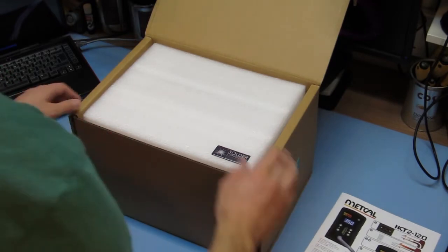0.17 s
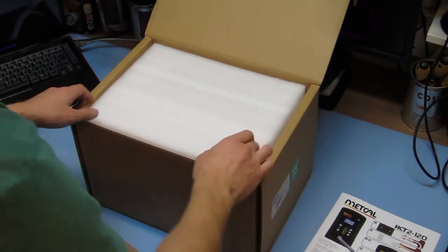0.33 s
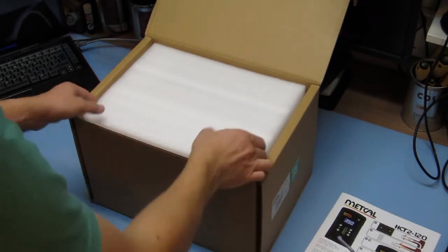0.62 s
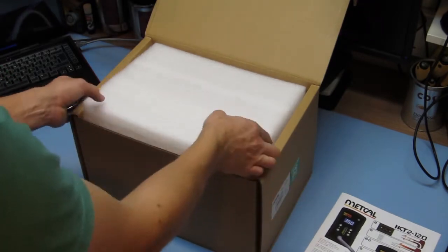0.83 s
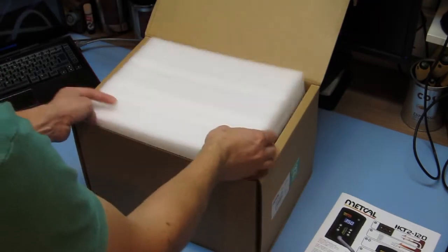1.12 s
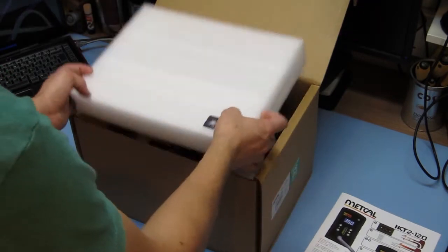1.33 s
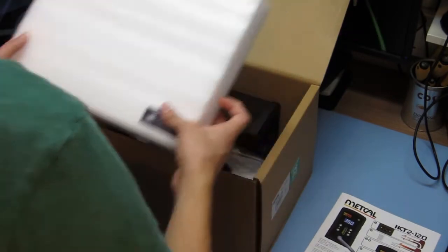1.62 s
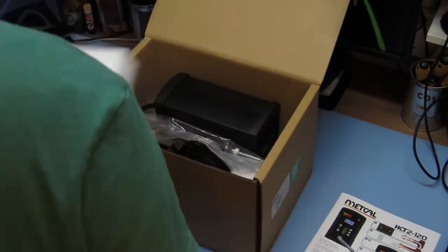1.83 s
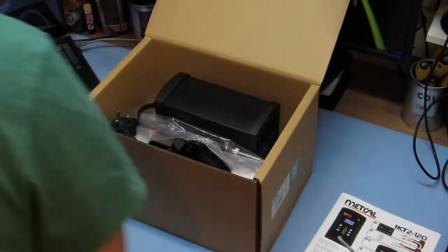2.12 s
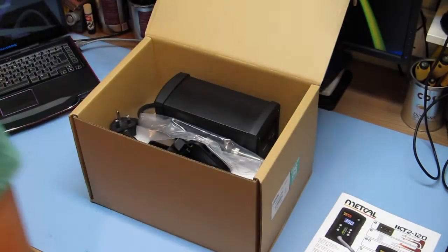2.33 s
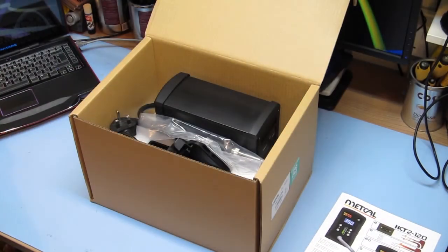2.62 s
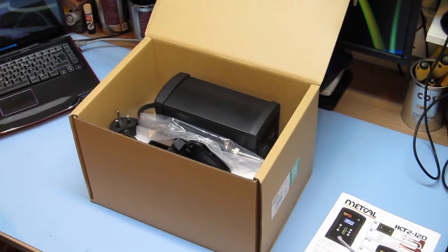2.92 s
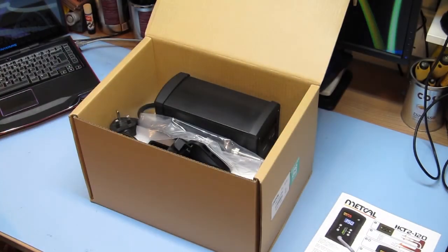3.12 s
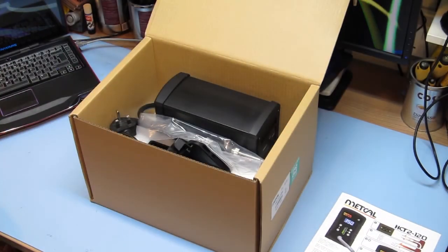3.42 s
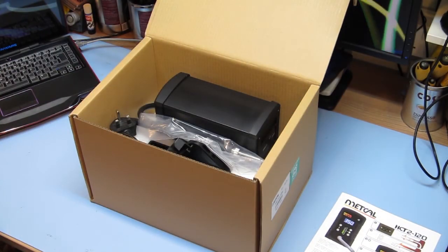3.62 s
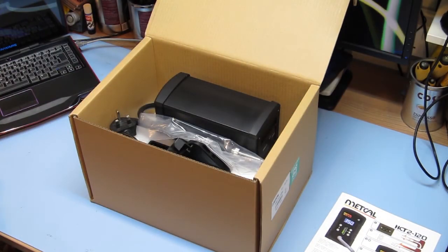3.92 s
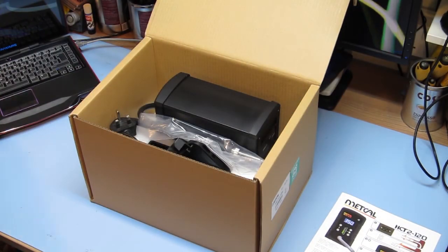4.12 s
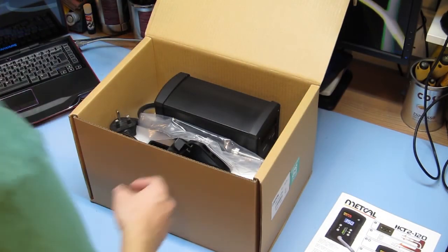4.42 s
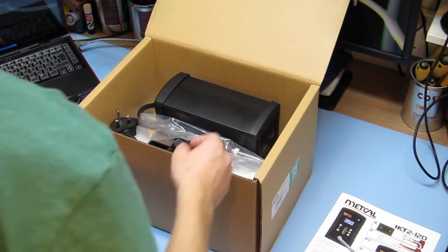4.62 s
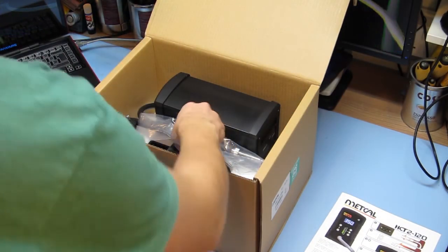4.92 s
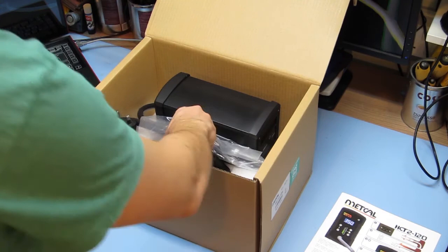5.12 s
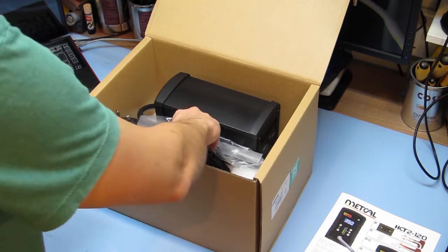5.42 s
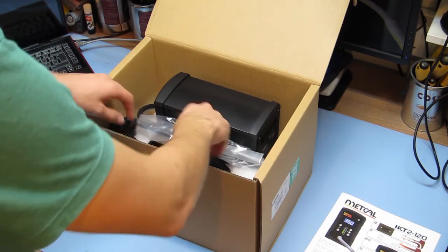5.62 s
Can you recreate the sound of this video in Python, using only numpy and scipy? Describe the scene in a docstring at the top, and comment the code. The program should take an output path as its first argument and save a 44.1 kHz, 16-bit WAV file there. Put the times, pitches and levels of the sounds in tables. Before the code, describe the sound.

A small, cluttered room with a quiet steady fan and low electrical hum, heard closely in stereo with slightly dull treble. From 0.3 to 0.75 s, soft touches, light foam rubbing and small ticks. Between 0.8 and 1.35 s, short coarse scrapes come quickly; at 1.04 s the foam jerks free with a sharp woody snap, a hollow thump and soft panel boom. Rubbing fades around 1.5 s, then two strong boxy knocks land at 1.73 and 1.78 s, followed by a breathy scrape at 2 s. It quietens, then dull thumps at 3.1 and 3.36 s and soft scrapes mark setting down, slightly left, with a tiny high squeak at 3.27 s. Faint rustles continue; a double hollow thump comes at 4.4 s. From 4.95 s plastic crackles in bright, uneven clicks, densest near 5.1 s, thinning with minute squeaks until 5.75 s.

```python
"""Foam pulled from a cardboard box

A small workroom with a humming fan, miked in stereo among near surfaces and with a dull treble.
Stroke by stroke a foam insert is gripped, pulled out with a snap and a scrape, and set down nearby, to the left.
Sparse random slips make the scrape, damped swings the hollow thumps, ringing modes the snap, noise bursts the ticks.
Gliding sines make brief squeaks; then a hand crinkles a plastic bag inside the box, as swells of coarser grains."""
import sys
import numpy as np
from scipy import signal
from scipy.io import wavfile

SR = 44100
rng = np.random.default_rng(int(sys.argv[2]) if len(sys.argv) > 2 else 0)


def generate_wav(signal):
    """Clip the signal to [-1, 1] and save it as 16-bit WAV at the path in sys.argv[1]."""
    frames = np.transpose(np.atleast_2d(signal))
    scaled = np.clip(frames, -1, 1) * 32767
    pcm = np.round(scaled).astype(np.int16)
    wavfile.write(sys.argv[1], SR, pcm)


N = 253839
TIME = np.arange(N) / SR


def from_db(db):
    """Decibels to gain."""
    return 10 ** (np.asarray(db) / 20)


def rms_one(x):
    """Scale to unit power."""
    return x / np.sqrt(np.mean(x ** 2) + 1e-20)


def at_hz(points, hz):
    """Read a spectrum on a log-frequency axis."""
    f, value = np.transpose(points)
    return np.interp(np.log(hz), np.log(f), value)


def cut(x, hz, kind):
    """Butterworth low-, high- or band-pass, designed at order 2."""
    corners_hz = np.clip(hz, 10, .45 * SR)
    sections = signal.butter(2, corners_hz, kind, fs=SR, output="sos")
    return signal.sosfilt(sections, x + 1e-18)  # the tiny offset keeps the filter out of denormal numbers


def drift(rate):
    """Random wander of spread 1, joined by straight lines between 2 * rate knots a second."""
    knots = np.arange(0, TIME[-1] + 1, .5 / rate)
    return np.interp(TIME, knots, rms_one(rng.standard_normal(len(knots))))


def white(size=N):
    """Four unrelated noises, as two mid-side pairs."""
    return rng.standard_normal((2, 2, size))


def grains(per_s, spread_db):
    """Tiny slips at random moments, of slightly uneven size."""
    happens = rng.random(N) < per_s / SR
    size_db = spread_db * np.minimum(rng.exponential(1, N), 4)
    return white() * happens * from_db(size_db)


# how alike the left and right microphones hear: f/Hz, correlation (1 = identical)
LIKENESS = [(50, 0.79), (300, 0.58), (1000, 0.79), (2500, 0.46), (5000, 0.22), (10000, 0.17), (16000, 0.17)]


def colour(drive, spectrum):
    """Half-octave bands shape a drive into stereo sound, mostly wider towards the treble; rms 1."""
    out = 0
    edges_hz = 17000 / np.sqrt(2) ** np.arange(19, -1, -1)
    for k, (low, high) in enumerate(zip(edges_hz, edges_hz[1:])):
        hz = np.sqrt(low * high)
        if spectrum[0][0] < high and low < spectrum[-1][0]:
            mid, side = cut(drive[k % 2], [low, high], "band")  # neighbouring bands use different noise
            alike = at_hz(LIKENESS, hz)
            stereo = np.sqrt(1 + alike) * mid + np.sqrt(1 - alike) * side * [[1], [-1]]
            out = out + from_db(at_hz(spectrum, hz)) * stereo
    return rms_one(out)


def add(out, s, sound):
    """Mix a short sound in at time s."""
    i = round(s * SR)
    out[:, i:i + sound.shape[-1]] += sound[..., :N - i]


def burst(spectrum, crack_s, tail_s, tail_db, rise_s=0.0009):
    """A crack and a short rattling tail; peak 1."""
    t = TIME[:SR // 5]
    decay = np.exp(-t / crack_s) + from_db(tail_db) * np.exp(-t / tail_s)
    shape = decay * (1 - np.exp(-t / rise_s))
    sound = colour(white(size=len(t)) * shape, spectrum)
    return sound / np.abs(sound).max()


def to_the_left(x, lag_s):
    """Sound from the left reaches the right microphone a moment later."""
    return np.array([x[0], np.interp(TIME - lag_s, TIME, x[1])])


# the level is this far down one rise time before and one fall time after the peak
SWELL_DROP_DB, RISE_POWER, FALL_POWER = 10.5, 1.48, 1.23


def swell(peak_s, rise_s, fall_s):
    """Gain of one push: it gathers speed to its peak and dies away."""
    t = TIME[::40]  # a coarse grid is enough for so slow a curve
    before = (np.maximum(peak_s - t, 0) / rise_s) ** RISE_POWER
    after = (np.maximum(t - peak_s, 0) / fall_s) ** FALL_POWER
    gain = from_db(-SWELL_DROP_DB * np.minimum(before + after, 20))
    return np.interp(TIME, t, gain)


# spectrum of the air noise: f/Hz, relative level/dB per Hz
AIR = [(25, -12), (45, -5), (85, 3.5), (140, -7), (300, -9.5), (500, -12), (750, -15.5), (1500, -17.5),
       (2300, -22), (4700, -24.5), (8000, -36.5), (10000, -30), (14000, -25), (16000, -56)]
AIR_DB = -48.03  # rms, before the left-right balance
# fan and mains hum lines: f/Hz, level/dB rms before wavering and balance
HUM = [(76, -68.5), (100, -58.5), (199.5, -63.5), (314, -59.5), (497, -69.5), (647, -62)]


def fan():
    """Steady air noise with hum lines that waver slightly in level and phase."""
    hum = 0
    for hz, db in HUM:
        level = from_db(db + 1.47 * drift(6.1))
        hum = hum + level * np.sqrt(2) * np.sin(2 * np.pi * hz * TIME + 0.62 * drift(2.3))
    air = from_db(AIR_DB) * colour(white(), AIR)
    return (air + hum) * from_db([[-.8], [.7]])  # a little louder on the right


# strokes of foam against cardboard and hands, levels before the voice trims:
# peak t/s, rise t/s, fall t/s, scrape level/dB, cell hiss level/dB re scrape, panel level/dB re scrape
STROKES = [ (.27, 0.016, 0.1, -61.5, 6, 6), (.415, 0.056, 0.026, -43.5, -7.5, -5.5),
           (.58, 0.057, 0.15, -50, -3, 1), (.735, 0.03, 0.066, -52.5, -2, 4),
           (0.831, 0.035, 0.054, -34, -13, 1.5), (0.946, 0.016, 0.023, -31, -9.5, -3.5),
           (1.054, 0.048, 0.079, -37, -8.5, 1.5), (1.105, 0.051, 0.11, -36, -10, -7.5),
           (1.24, 0.029, 0.027, -31.5, -7, -4.5), (1.27, 0.019, 0.039, -35.5, 3, -13),
           (1.3, 0.032, 0.023, -28, -4, -3.5), (1.43, 0.13, 0.23, -44, -7, -18),
           (1.515, 0.022, 0.033, -38.5, -6, 0), (1.585, 0.054, 0.073, -40, -8, -26),
           (1.79, 0.28, 0.18, -46.5, -6, -2), (1.993, 0.12, 0.16, -35.5, -9.5, -14.5),
           (2.24, 0.047, 0.1, -60.5, 1, 2), (2.65, .12, 0.13, -51, -17, -11),
           (3.002, 0.01, 0.039, -48.5, 2, -1), (3.04, 0.056, 0.17, -42.5, -6.5, -10),
           (3.275, 0.06, 0.091, -40, -12.5, -7), (3.42, 0.039, 0.031, -51, -0.5, 5),
           (3.505, .015, 0.028, -56, -7, 3), (3.63, 0.015, 0.022, -55, -2, -6),
           (3.84, 0.05, 0.016, -55, -10, 0), (4.01, 0.056, 0.099, -56, -7, -7),
           (4.17, .05, 0.066, -52.5, -14, -4), (4.47, 0.11, .14, -50.5, -6.5, 2.5)]
# spectra of foam edge, foam cells and rubbed panels: f/Hz, relative level/dB per Hz
SCRAPE = [(700, -10), (1200, -2.5), (1800, 0.5), (2500, 0), (3500, 1), (5000, -5), (6500, -15.5),
          (8000, -20.5)]
HISS = [(5000, -5.5), (7500, -10.5), (9500, -2.5), (11500, -2), (13500, 0), (16000, -10)]
PANEL = [(140, -13), (250, -1), (450, 0.5), (750, -1.5), (1200, -7.5), (1800, -9.5), (2800, -13)]
ASIDE_S = 2.5  # strokes that peak after this come from the left


def sliding():
    """Foam cells catch and slip by the thousand; the panels they rub on speak lower."""
    slips = grains(per_s=7000, spread_db=0.37) * from_db(1.9 * drift(80))
    scrape = from_db(-0.13) * colour(slips, SCRAPE)
    hiss = from_db(6.0) * colour(slips, HISS)
    panel = from_db(-0.5) * colour(slips, PANEL)
    power = np.zeros((2, 3, N))  # lifting or stowing, voice, time
    for s, rise_s, fall_s, db, hiss_db, panel_db in STROKES:
        levels = from_db([[db], [db + hiss_db], [db + panel_db]])
        power[int(s > ASIDE_S)] += (levels * swell(s, rise_s, fall_s)) ** 2
    # overlapping strokes add in power
    lift, stow = (sum(gain * voice for gain, voice in zip(np.sqrt(move), (scrape, hiss, panel))) for move in power)
    return lift + to_the_left(stow, lag_s=.00005)


# pushes that bend large panels: peak t/s, level/dB before a common trim
FLEXES = [(.29, -43), (1.06, -29.5), (1.15, -45), (1.245, -36), (1.3, -34), (1.78, -36), (3.105, -37),
          (3.16, -36.5), (3.28, -38.5), (3.37, -40), (4.42, -40.5), (5.13, -41.5), (5.73, -41)]
# spectrum of the panel boom: f/Hz, relative level/dB per Hz
BOOM = [(30, -34), (60, 5), (120, -3.5), (180, -15.5), (350, -24)]


def flexing():
    """Large panels bend under each push with a soft boom."""
    bend = sum(from_db(db) * swell(s, rise_s=.03, fall_s=0.047) for s, db in FLEXES)
    return from_db(-2.0) * bend * colour(white(), BOOM)


# sharpest ticks of foam edges and plastic creases, before common trims: t/s, level/dB, treble level/dB
TICKS = [(0.419, -29, 3), (0.704, -27, -8), (0.7374, -20, -9), (.936, -26, 3), (1.0135, -25, -15),
         (1.159, -27, 8), (1.51, -24.5, 1), (1.681, -34.5, 18.5), (4.255, -34.5, -14), (4.950, -34, -1),
         (4.9788, -17.5, 2.5), (5.034, -23, -15), (5.047, -20, -15), (5.068, -13, -11), (5.0758, -14, -10),
         (5.084, -17, 6), (5.090, -16, -1), (5.118, -11.5, -6), (5.190, -30.5, -25), (5.265, -29.5, -5),
         (5.289, -23.5, -2), (5.3104, -18.5, -23), (5.4289, -24.5, -24), (5.495, -23, -14),
         (5.712, -23.5, 3.5)]
# spectrum of a buckling crease, also heard in the snap and the bag: f/Hz, relative level/dB per Hz
CREASE = [(200, -14), (700, 1.5), (1500, 0), (2300, 1.5), (3500, 1.5), (5500, 0.5), (7500, -8.5),
          (11000, -5), (13500, 3), (16000, -23)]


def ticks():
    """Creases and edges buckle one by one: a sharp click and a short rattle, each with its own brightness."""
    out = np.zeros((2, N))
    click = cut(signal.unit_impulse(SR // 5, SR // 1000), [2800, 7000], "band")
    for s, db, treble_db in TICKS:
        rattle = burst(CREASE, crack_s=0.0018, tail_s=0.0099, tail_db=-6.5, rise_s=0.00075)
        tick = from_db(9) * click + rattle
        body = cut(tick, 5500, "low")
        treble = from_db(treble_db + 0.5) * cut(tick, 7700, "high")
        add(out, s, from_db(db - 1.5) * (body - treble))
    return out


# hollow blows on foam and box: t/s, level/dB, pitch f/Hz, damping time/cycles, hard contact level/dB re blow
THUMPS = [(.421, -25.5, 267, 0.63, -4), (.705, -33, 484, 0.16, -0.5), (1.040, -16, 344, 0.31, -28),
          (1.176, -26.5, 590, 0.42, -3), (1.241, -18.5, 402, 0.16, -10.5), (1.288, -26, 263, .5, -20),
          (1.314, -27, 84, 0.85, -20), (1.7313, -10.5, 533, 0.49, -10.5), (1.7779, -9.5, 439, 0.41, -10),
          (1.792, -22.5, 287, 0.81, -21), (2.2004, -34, 660, 0.21, 8.5), (3.094, -17, 218, 0.21, -30),
          (3.360, -13.5, 254, .25, -4.5), (4.3437, -40.5, 780, 0.48, 10), (4.3934, -13, 323, 0.46, -17),
          (4.406, -16.5, 418, 0.43, -12), (4.446, -28.5, 332, 0.95, -22), (5.0686, -19.5, 720, 0.6, -8),
          (5.407, -40.5, 780, 0.66, 3.5), (5.717, -35.5, 301, 0.33, 7.5)]
# spectra of the air ringing in the box and of the hard contact: f/Hz, relative level/dB per Hz
HOLLOW = [(110, -29), (220, 2.5), (330, 8.5), (450, -7.5), (700, -24)]
CONTACT = [(150, -7), (600, 12), (1300, 0.5), (1900, -5.5), (4000, -25), (12000, -55)]


def thumps():
    """A heavily damped panel swings briefly and the hollow rings on; harder contacts add a knock."""
    out, t = np.zeros((2, N)), TIME[:SR // 5]
    for s, db, hz, cycles, contact_db in THUMPS:
        damping_s = cycles / hz
        age = t / (2 * damping_s)  # the swing's envelope peaks at age 1
        swing = -age ** 2 * np.exp(2 - 2 * age) * np.sin(2 * np.pi * hz * t)
        hollow = from_db(-16) * burst(HOLLOW, crack_s=0.014, tail_s=0.048, tail_db=2, rise_s=0.0064)
        knock = burst(CONTACT, crack_s=0.008, tail_s=0.019, tail_db=0.5, rise_s=.0001)
        add(out, s, from_db(db) * (swing + hollow))
        add(out, s + damping_s, from_db(db + contact_db) * knock)
    return to_the_left(out, lag_s=.00002)


# the foam edge jumps free of the wall: t/s, level/dB
SNAPS = [(1.039, -9), (1.0398, -3), (1.0416, -8)]
# ringing modes of the cardboard wall: f/Hz, mean level/dB, t60/s
WALL = [(737, -12.5, 0.027), (1130, -17.5, 0.02), (1415, -15, 0.032), (1790, -4, 0.025),
        (1990, -3.5, 0.025), (2190, -16, 0.018), (2560, -3.5, 0.0078), (3070, -11, 0.0092),
        (4660, -12, 0.01), (5230, -7.5, 0.011)]


def snap():
    """The foam lets go in quick jerks that crack against the wall and set it ringing."""
    out, t = np.zeros((2, N)), TIME[:SR // 5]
    for s, db in SNAPS:
        ring = 0
        for k, (hz, level_db, t60) in enumerate(WALL):
            uneven_db = rng.normal(0, 0.96, (2, 1))  # each side hears each mode a little differently
            decay = from_db(level_db + uneven_db - 60 * t / t60)
            ring = ring + decay * np.sin(2 * np.pi * hz * t) * (-1) ** k
        crack = burst(CREASE, crack_s=0.0016, tail_s=0.0075, tail_db=-12.0, rise_s=0.00035)
        add(out, s, from_db(db) * (ring + from_db(-4.0) * crack))
    return out


# short squeaks of foam and plastic, and last a thin ring of the box contents after a tick: t/s, length t/s,
# mean pitch f/Hz, level/dB before a common trim
SQUEAKS = [(3.272, 0.021, 3230, -34.5), (3.614, 0.029, 3010, -50), (4.251, 0.011, 3110, -44),
           (5.215, 0.013, 1380, -47), (5.308, 0.015, 3110, -40), (5.313, .04, 1375, -45.5),
           (5.425, .013, 3204, -43), (5.511, 0.069, 1634, -49)]
SQUEAK_WAVER_PER_KHZ = 0.018  # higher squeaks are less steady: share of the pitch


def squeaks():
    """For a moment stick and slip lock into an unsteady pitch, with a grip that comes and goes."""
    out = np.zeros((2, N))
    for s, length_s, hz, db in SQUEAKS:
        size = round(length_s * SR)
        waver = SQUEAK_WAVER_PER_KHZ * hz / 1000 * drift(500)[:size]
        phase = 2 * np.pi * np.cumsum(hz * (1 + waver)) / SR
        grip = np.hanning(size) * from_db(2.4 * drift(174)[:size])
        add(out, s, from_db(db + 3.0) * grip * np.sin(phase))
    return out


# fingers close on the plastic bag: peak t/s, crackle level/dB before a common trim
GRABS = [(5.01, -44), (5.11, -43), (5.325, -47), (5.51, -48.5)]


def bag():
    """Thin plastic crackles in random grains as the fingers close on it inside the box."""
    crackle = colour(grains(per_s=1000, spread_db=0.5), CREASE)
    grip = sum(from_db(db) * swell(s, rise_s=0.071, fall_s=0.067) for s, db in GRABS)
    return from_db(1.0) * grip * cut(crackle, 13400, "low")


# echoes from bench, lid and walls: delay t/s, level/dB before dulling
ECHOES = [(.003, -27), (.0077, -19), (0.0129, -16.5), (0.0178, -15), (.036, -15)]
ROOM_T60_S = 0.17  # a small, cluttered room


def room(x, wet_db, dull_hz):
    """A few dull echoes from near surfaces, and a short diffuse tail."""
    t = TIME[:SR // 2]
    diffuse = colour(white(size=len(t)), [(40, 11), (500, -8.5), (3000, 12.5), (16000, 8.0)])
    tail = diffuse * from_db(-60 * t / ROOM_T60_S) * (1 - np.exp(-t / 0.00067))
    echoes = np.zeros(len(t))
    for delay_s, db in ECHOES:
        echoes[round(delay_s * SR)] += from_db(db)
    response = cut(echoes, dull_hz, "low") + from_db(wet_db) * rms_one(tail) / np.sqrt(len(t))
    return x + signal.fftconvolve(x, response, axes=1)[:, :N]


def scene():
    """All the handling, in the room, over the fan; below the treble the right side is a little louder."""
    foam_and_box = sliding() + flexing() + ticks() + thumps() + snap()
    handling = room(foam_and_box + squeaks() + bag(), wet_db=-9.0, dull_hz=2310)
    body = signal.sosfilt(signal.butter(1, 7000, fs=SR, output="sos"), handling)
    return handling + body * (from_db([[-1.2], [1.0]]) - 1) + fan()


def record(dry):
    """The microphone has a deep notch in the treble and rolls off above it; peaks clip and the top is cut."""
    notch = signal.butter(2, [7800, 8750], "bandstop", fs=SR, output="sos")
    heard = cut(signal.sosfilt(notch, dry), 13200, "low")
    clipped = np.clip(heard, -1, 1)
    top_cut = signal.ellip(10, .2, 80, 15900, fs=SR, output="sos")  # steep, at 15.9 kHz
    return signal.sosfilt(top_cut, clipped)


dry = scene()
out = record(dry)
generate_wav(out)
```